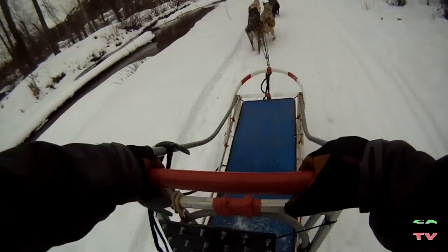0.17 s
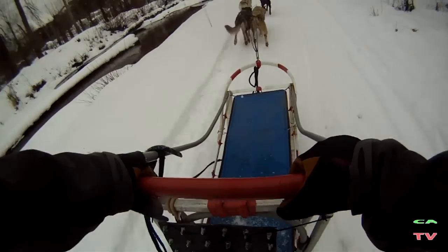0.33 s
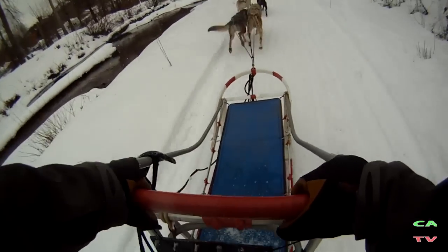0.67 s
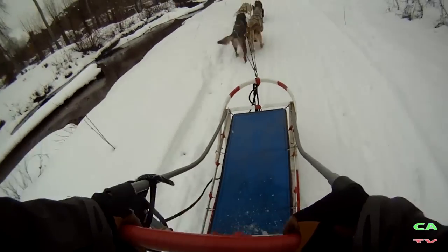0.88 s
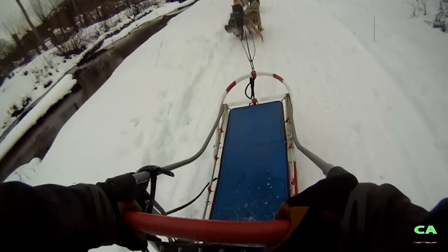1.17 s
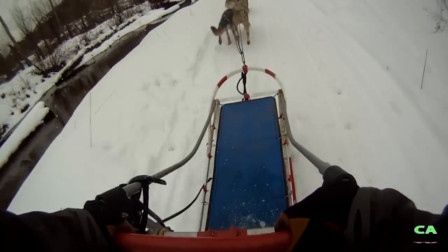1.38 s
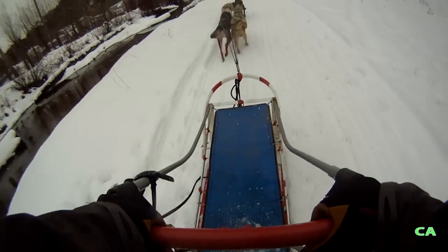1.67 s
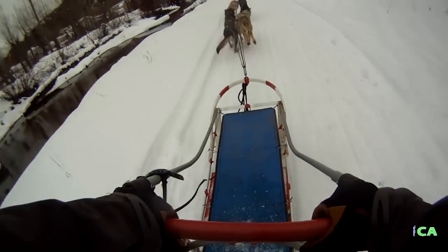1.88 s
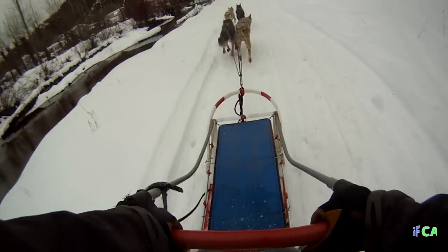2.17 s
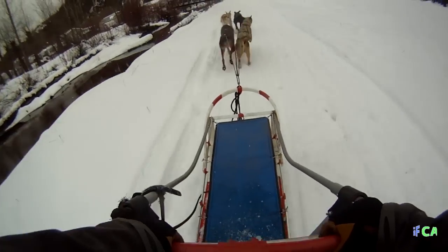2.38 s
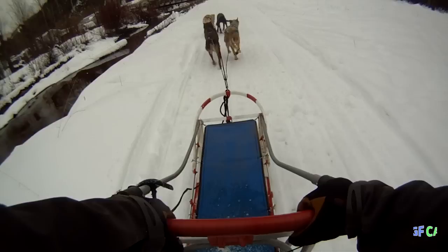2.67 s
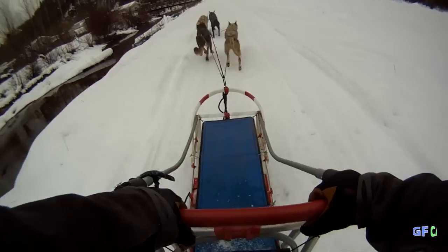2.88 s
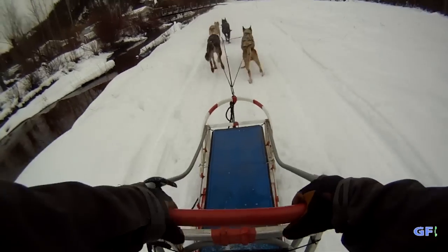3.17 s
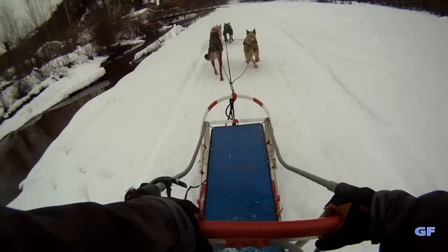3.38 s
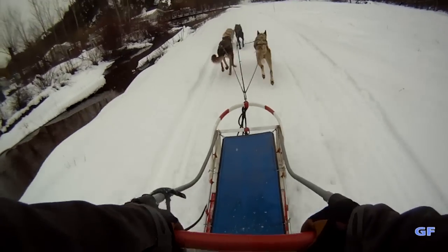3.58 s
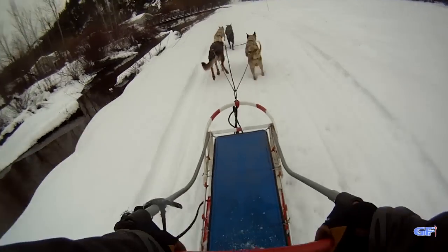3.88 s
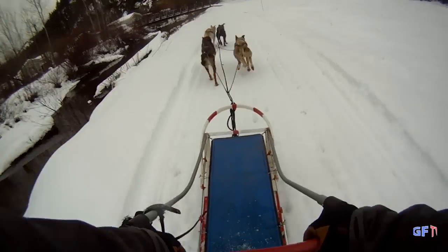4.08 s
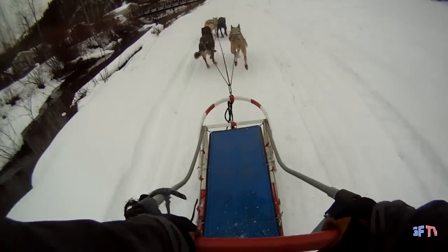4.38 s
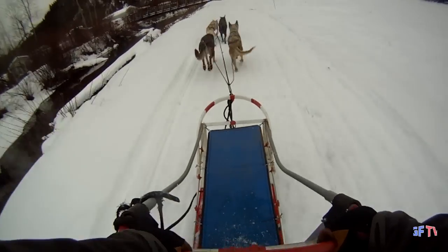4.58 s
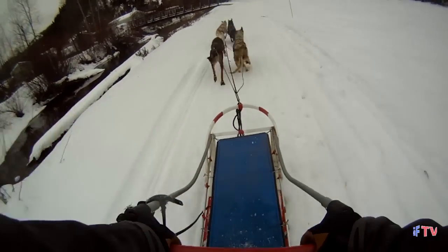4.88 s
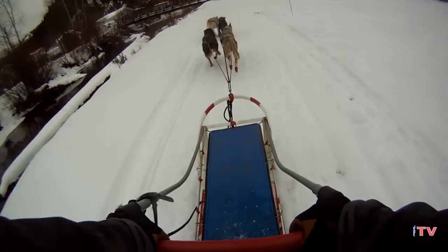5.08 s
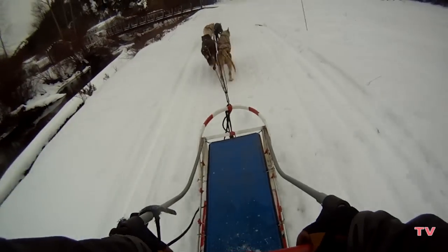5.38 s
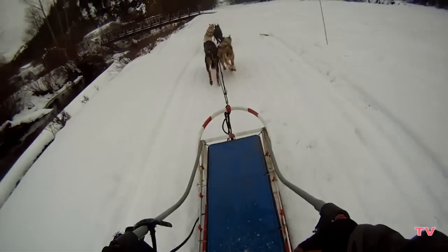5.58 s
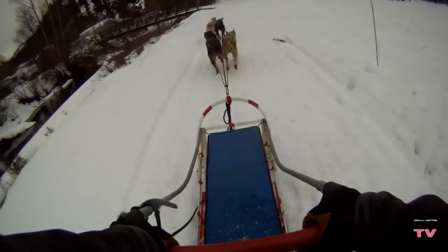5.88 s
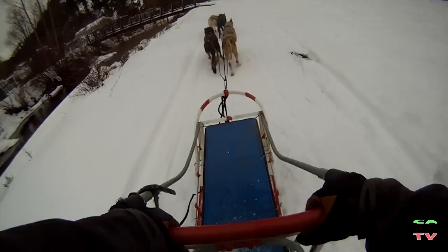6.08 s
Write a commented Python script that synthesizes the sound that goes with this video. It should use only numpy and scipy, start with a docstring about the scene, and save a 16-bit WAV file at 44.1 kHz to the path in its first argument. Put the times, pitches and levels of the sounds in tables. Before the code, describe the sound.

Sled runners hiss and crunch steadily over packed snow, with soft running-pace jolts, brief dry squeaks and a few very loud, sharp knocks.

```python
"""A dog sled on packed snow, heard on the microphone of a camera in a closed case worn by the driver.
Throughout, shaped noise and tiny cracks make the runners hiss and crunch over a low noise rumble.
A faint knock opens; jolts follow at running pace from 0.3 s, as pushes on a springy mount.
A dry joint squeaks from 0.6 s as a stuttering tone, and a knock rings the case modes near 1.25 s.
Scrapes and bumps swell in between; knocks near 3.6, 4.3 and 6.2 s overload the microphone."""
import sys
import numpy as np
from scipy import signal
from scipy.fft import rfft, irfft
from scipy.io import wavfile
from scipy.ndimage import uniform_filter1d

SR = 44100
rng = np.random.default_rng(int(sys.argv[2]) if len(sys.argv) > 2 else 0)


def unload_wav(signal):
    """Save mono or channel-first audio to the path in sys.argv[1] as 16-bit WAV at rate SR, clipped to [-1, 1]."""
    wavfile.write(
        sys.argv[1],
        SR,
        np.round(np.clip(np.atleast_2d(signal).T, -1, 1) * 32767).astype(np.int16),
    )


N = 275184
T = np.arange(N) / SR  # time [s]
FREQS = np.maximum(np.fft.rfftfreq(N, 1 / SR), 1)  # [Hz]


def undb(db):
    """Decibels to gain."""
    return 10 ** (np.asarray(db) / 20)


def unit(x):
    """Scale to rms 1."""
    return x / np.sqrt(np.mean(x ** 2))


def colour(x, gain):
    """Filter by a gain for each frequency; rms 1."""
    return unit(irfft(rfft(x) * gain, N))


def slope(points):
    """Gain through (frequency [Hz], gain [dB]) points, straight over log frequency."""
    hz, db = np.transpose(points)
    return undb(np.interp(np.log(FREQS), np.log(hz), db))


def resonance(hz, width_hz):
    """Gain of a steep resonance: a band-pass applied twice."""
    detuning = (FREQS ** 2 - hz ** 2) / (FREQS * width_hz * np.pi / 2)
    return 1 / (1 + detuning ** 2)


def noise():
    """White noise."""
    return rng.standard_normal(N)


def walk(rate):
    """Random levels held 1 / rate s and slewed twice; spread near 1."""
    hold = int(SR / rate)
    steps = np.repeat(rng.standard_normal(N // hold + 1), hold)
    slewed = uniform_filter1d(uniform_filter1d(steps, hold), hold)
    return unit(slewed[:N])


def swell(s, length):
    """A smooth bell-shaped rise and fall around time s; length is its standard deviation [s]."""
    return np.exp(-.5 * ((T - s) / length) ** 2)


def swelling_level(s, length, db):
    """Gain of a swell that peaks at the given level."""
    return undb(db) * swell(s, length)


def crunch(rate, spread_db):
    """Snow crystals breaking: many tiny cracks (rate per second), a few of them larger."""
    size = undb(spread_db * np.minimum(rng.exponential(size=N), 5))
    cracks = rng.random(N) < rate / SR
    return unit(cracks * size * rng.choice([-1, 1], N))


def ringing_decay(t, t60):
    """Exponential decay that falls 60 dB in t60 seconds."""
    return np.exp(-np.log(1000) * t / t60)


# Resonances that colour the hiss: (frequency [Hz], width [Hz], relative gain [dB])
HISS_MODES = [(1141, 153, -4.5), (2057, 380, -1.5), (2695, 296, -2.5), (3507, 273, -3.5),
              (4340, 790, -12.5), (5396, 580, -10)]
# Broad hiss under the resonances: (frequency [Hz], relative gain [dB])
HISS_BASE = [(100, -8), (400, -13.5), (800, -14), (1600, -11), (3000, -29), (5000, -18.5), (6000, -24)]


def snow_colour():
    """What the case lets through of the sliding noise: resonances and a broad base, added as power."""
    power = sum((undb(db) * resonance(hz, width)) ** 2 for hz, width, db in HISS_MODES)
    return np.sqrt(power + slope(HISS_BASE) ** 2)


# Sway of the camera: (frequency [Hz], relative gain [dB])
SWAY = [(5, -18), (18, 7.5), (40, -4.5), (70, -13.5), (140, -17.5), (500, -38.5)]


def camera_sway(level_db=-48):
    """The camera sways: steady noise, mostly below the audible bass."""
    return undb(level_db) * colour(noise(), slope(SWAY))


# Sled body on the trail: (time [s], rumble level before trim and unevenness [dB])
TRAIL = [(0, -63), (.35, -60), (1.25, -67), (1.55, -59), (2, -68), (2.5, -67), (2.85, -60), (3.4, -56),
         (3.9, -65), (4.85, -58), (5.05, -50), (5.45, -57), (6.24, -59)]
# Spectrum of that rumble: (frequency [Hz], relative gain [dB])
RUMBLE = [(20, 31.5), (70, -36), (140, -13), (260, -1.5), (450, -22), (900, -19), (3000, -72)]


def body_rumble(trim_db=1.5, uneven_db=3.0):
    """The sled body rumbles: low noise that follows the trail and wavers unevenly."""
    db = np.interp(T, *np.transpose(TRAIL)) + trim_db + uneven_db * walk(18)
    return undb(db) * colour(noise(), slope(RUMBLE))


# Bumps under the sled bed: (time [s], swell length [s], level [dB], frequency [Hz])
BUMPS = [(0.085, 0.0075, -52.5, 223), (0.393, .05, -50, 50.4), (1.32, 0.031, -62.5, 269),
         (1.492, 0.023, -46, 35), (1.94, 0.053, -62, 246), (2.101, 0.0065, -50, 275),
         (2.497, 0.029, -50, 123), (2.538, 0.052, -50, 90), (3.827, 0.032, -52, 165),
         (4.127, 0.03, -49.5, 190), (4.869, 0.029, -54.5, 209), (5.766, 0.036, -41.5, 34.4)]


def bed_drumming():
    """The sled bed drums over bumps: short swells of noise through a broad resonance."""
    return sum(swelling_level(s, length, db) * colour(noise(), resonance(hz, .5 * hz))
               for s, length, db, hz in BUMPS)


# Bouts of squeaking at a dry joint: (time [s], swell length [s], level before the stutter [dB])
SQUEAKS = [(0.602, .035, -51), (0.717, 0.017, -52), (0.837, .015, -52), (.96, 0.034, -48.5),
           (2.447, .006, -49), (2.6, .006, -49)]


def squeaks(hz=4440, width_hz=90, idle_db=-65, slips_per_s=34, uneven=0.268, stick_db=-14):
    """One dry joint sticks and slips in thin stuttering chirps, and chafes faintly all the time."""
    narrow = colour(noise(), resonance(hz, width_hz))
    note = unit(narrow / np.abs(signal.hilbert(narrow)))  # an even tone whose pitch wavers
    rubbing = undb(idle_db) + sum(swelling_level(*bout) for bout in SQUEAKS)
    slips = np.cumsum(slips_per_s * (1 + uneven * walk(30))) / SR  # running count
    stutter = undb(stick_db * np.sin(np.pi * slips) ** 2)
    return note * rubbing * stutter


# Strength of each jolt, one a stride: (peak level [dB])
JOLTS = [-40, -29.5, -28.5, -37, -32, -32, -33, -36, -43, -30.5, -31.5, -39, -30.5, -32.5, -33.5, -30.5,
         -30.5]
FIRST_JOLT_S, STRIDE_S, PUSH_S = .289, .3584, 0.0033  # running pace; each push lasts the same


def jolts(spring_hz=27, damping=0.45):
    """Once a stride a soft push rebounds on the springy camera mount, a resonant high-pass."""
    w = 2 * np.pi * spring_hz
    b, a = signal.bilinear([1, 0, 0], [1, damping * w, w * w], SR)
    out = 0
    for stride, db in enumerate(JOLTS):
        push = -swell(FIRST_JOLT_S + stride * STRIDE_S, PUSH_S)
        thud = signal.lfilter(b, a, push)
        out = out + undb(db) * thud / np.abs(thud).max()
    return out


# Ring of the camera case: (frequency [Hz], level before tilt [dB], t60 [s])
CASE = [(284, -51, 0.037), (687, -25, 0.029), (1182, -11, 0.025), (1643, -1.5, 0.016), (1930, 1, 0.02),
        (2175, 9.5, 0.012), (3100, -7, 0.01), (3515, 1, 0.012), (4840, -3, 0.0091), (5520, -12.5, 0.0095)]
# Knocks of frame and mount, some in quick double contacts: (time [s], peak of the ring [dB],
# note of the struck part [Hz], its level against the case [dB], dullness [dB], rise [s])
KNOCKS = [(0.0769, -30.5, 1130, 4, 8, 0.00037), (1.1796, -33, 2650, 3, 2, .0004),
          (1.2352, -23.5, 1920, -4, 8, 0.0024), (1.254, -8, 3166, -1, -12, 0.00039),
          (1.299, -32, 3400, 1, 31, 0.00071), (1.35, -34.5, 1120, 9, 19, 0.00041),
          (1.8756, -31, 694, -2, 19.5, 0.0009), (2.096, -39, 290, -4, 23, 0.0008),
          (3.5668, -2, 5440, -2, -14, 0.00039), (3.5684, 1.5, 1960, 4.5, -1.5, 0.00073),
          (3.884, -28, 3500, -9, -3, 0.0024), (4.151, -24, 1600, 2, -10, 0.0014),
          (4.177, -29, 1720, -2, -9, 0.0037), (4.2755, -10, 1130, -22, 1, 0.0027),
          (4.2792, 4, 1140, -8.5, 2, 0.00031), (4.289, 5, 1523, 1, -0.5, 0.00083),
          (4.96, -26, 1680, -9, -2, 0.0035), (5.1744, -15.5, 1870, 1, -13, 0.00058),
          (5.176, -15.5, 1920, 3, 3.5, 0.0024), (5.2608, -22.5, 1015, 2, 18.5, 0.0024),
          (6.1901, 4, 3580, -4.5, -3.5, 0.00058), (6.1963, -10, 1130, -6, -1, 0.0014),
          (6.2088, -3.5, 1370, -9.5, -9.5, .0007)]
BRIGHT_DB, DULL_SLOPE = 3, 0.55  # upper case modes: their lift, and dB lost per dB of dullness


def knocks(rasp_db=-18, rasp_t60=0.019, note_t60=0.013):
    """Each struck part sounds its own short note and rings the case; the surfaces rasp briefly."""
    out, t = np.zeros(N + SR), T[:SR // 10]
    hz, mode_db, t60 = np.transpose(CASE)[:, :, None]
    sign = (-1) ** np.arange(len(hz))[:, None]  # neighbouring modes move in opposite directions
    modes = sign * np.sin(2 * np.pi * hz * t) * ringing_decay(t, t60)
    rasp = colour(noise(), snow_colour())
    for s, db, note_hz, note_db, dull_db, rise in KNOCKS:
        start = int(s * SR)
        # a dull blow lifts the low modes and weakens the high ones
        upper_db = BRIGHT_DB - DULL_SLOPE * dull_db
        tilt = np.interp(hz, [900, 1900, 2300, 3100], [dull_db, 0, 0, upper_db])
        case = np.sum(undb(mode_db + tilt) * modes, axis=0)
        note = undb(note_db) * np.cos(2 * np.pi * note_hz * t) * ringing_decay(t, note_t60)
        attack = 1 - np.exp(-(t / rise) ** 2)
        ring = (case / np.abs(case).max() + note) * attack
        rasp_here = np.roll(rasp, -start)[:len(t)]
        scuff = undb(rasp_db) * rasp_here * ringing_decay(t, rasp_t60) * attack
        out[start:start + len(t)] += undb(db) * (ring / np.abs(ring).max() + scuff)
    return out[:N]


def ice(level_db=-65):
    """Sparse icy crumbs tick under the runners."""
    crumbs = crunch(rate=70, spread_db=3.0)
    return undb(level_db) * colour(crumbs, snow_colour() * resonance(3850, 1600))


# A runner bites into rougher snow:
# (time [s], swell length [s], level [dB], centre frequency [Hz], width [Hz])
SCRAPES = [(1.636, 0.058, -53, 5230, 420), (2.501, 0.015, -46.5, 1150, 170),
           (2.558, 0.069, -54.5, 1190, 250), (2.56, 0.062, -46.5, 2400, 1700),
           (3.003, 0.0063, -38.5, 2600, 350), (3.861, 0.015, -44, 1620, 1200),
           (4.158, 0.029, -40, 1640, 920)]


def scrapes():
    """Short gritty swells and thin squeaks where a runner bites: noise and cracks in a band."""
    tone = snow_colour()
    grit = noise() + crunch(rate=1100, spread_db=3.5)
    return sum(swelling_level(s, length, db) * colour(grit, tone * resonance(hz, width))
               for s, length, db, hz, width in SCRAPES)


# Runners sliding on snow, before the pressure changes: (time [s], hiss level [dB], treble level [dB])
GLIDE = [(0.0, -50, -57), (0.31, -49.5, -53.5), (0.5, -47.5, -57.5), (0.72, -51, -56.5), (1.03, -51, -56.5),
         (1.55, -49, -55), (1.7, -50.5, -56), (2.29, -51, -53.5), (2.72, -49.5, -58.5),
         (3.17, -49.5, -54.5), (3.61, -51, -59), (3.97, -49, -57), (4.42, -49.5, -58.5), (5.13, -49.5, -55),
         (5.23, -50, -56.5), (5.49, -49.5, -57.5), (5.89, -48.5, -54), (6.18, -50.5, -55)]
# Ruts and dips press the runners down (+) or unload them (-):
# (time [s], swell length [s], change of the hiss [dB])
RUTS = [(1.65, 0.055, 2.5), (1.847, 0.058, -1.5), (3.025, 0.053, 2.5), (3.432, 0.019, 6.5),
        (3.735, 0.029, 4), (3.86, 0.018, 3.5), (4.027, 0.057, -3.5), (4.44, 0.024, -4.5), (4.565, 0.069, 3),
        (4.757, 0.0091, 2), (4.914, 0.017, 4), (5.079, 0.028, 4.5)]


def runners(hiss_db=0, treble_db=0, growl_db=-10, growl_swing=1.08, treble_swing=1.3, grain_db=-2,
            patchy_db=0.5, flutter_db=0.8, flicker_db=1.12, growl_hz=1450, split_hz=4000):
    """Sliding noise and crunch in three ranges, louder where ruts and patchy snow press the runners."""
    s, *levels = np.transpose(GLIDE)
    hiss, treble = (np.interp(T, s, curve) for curve in levels)
    ruts = sum(db * swell(when, length) for when, length, db in RUTS)
    pressure = patchy_db * walk(12) + ruts
    hiss, treble = hiss + pressure, treble + treble_swing * pressure
    growl = hiss.mean() + growl_swing * (hiss - hiss.mean())
    # each range takes its share of the power
    low, below_split = (1 / (1 + (FREQS / hz) ** 12) for hz in (growl_hz, split_hz))
    ranges = ((low, growl + growl_db),
              (np.abs(below_split - low), hiss + hiss_db),
              (1 - below_split, treble + treble_db))
    tone, flutter = snow_colour(), flutter_db * walk(35)
    grains = crunch(rate=1400, spread_db=1.5)
    out = 0
    for share, db in ranges:
        slide = colour(noise() + undb(grain_db) * grains, tone * np.sqrt(share))
        flicker = flicker_db * walk(70)  # separate in each range
        out = out + undb(db + flutter + flicker) * slide
    return out


def scene(side_db=-64):
    """Everything arrives through the case as one centred sound; only a low rumble adds a little width."""
    sled = body_rumble() + bed_drumming() + squeaks()
    camera = camera_sway() + jolts() + knocks()
    snow = ice() + scrapes() + runners()
    mid = sled + camera + snow
    side = undb(side_db) * colour(noise(), slope(RUMBLE))
    return np.array([mid + side, mid - side])


TOP_HZ = 10900  # upper limit of the sound


def record(dry):
    """The camera flattens the hardest knocks and samples at only 12 kHz.
    Holding each sample mirrors the sound around 6 kHz, which gives the gritty top."""
    squashed = dry / (1 + dry ** 4) ** (1 / 4)
    coarse = signal.resample_poly(squashed, 40, 147, axis=1)  # down to 12 kHz
    stepped = np.repeat(coarse, 4, axis=1)  # held at 48 kHz
    held = signal.resample_poly(stepped, 147, 160, axis=1)[:, :N]
    low_pass = signal.ellip(8, .2, 85, TOP_HZ, fs=SR, output="sos")
    return signal.sosfilt(low_pass, held)


dry = scene()
out = record(dry)
unload_wav(out)
```